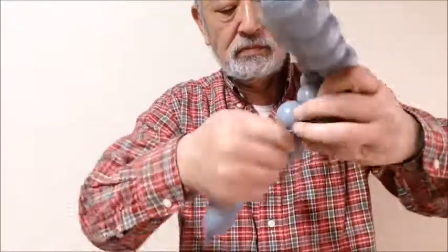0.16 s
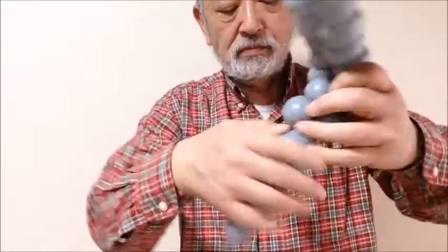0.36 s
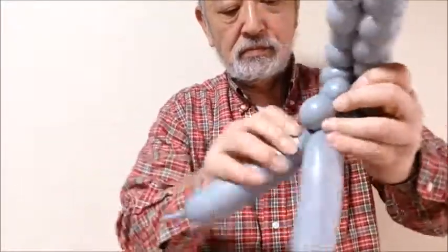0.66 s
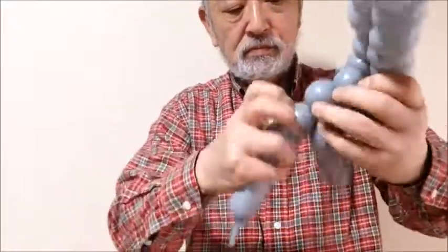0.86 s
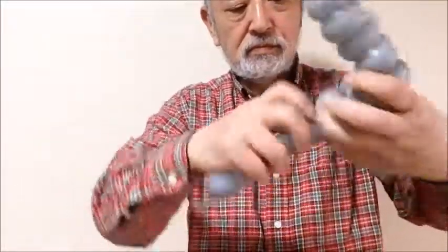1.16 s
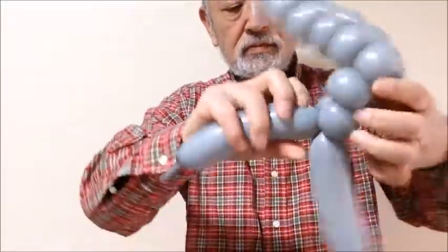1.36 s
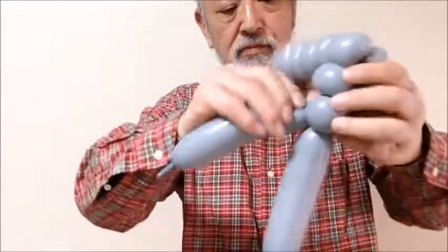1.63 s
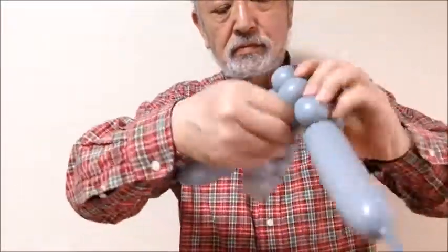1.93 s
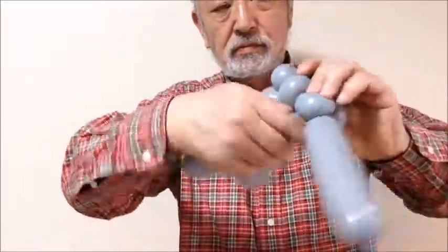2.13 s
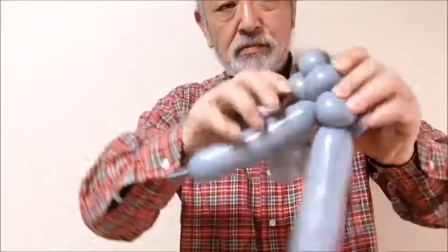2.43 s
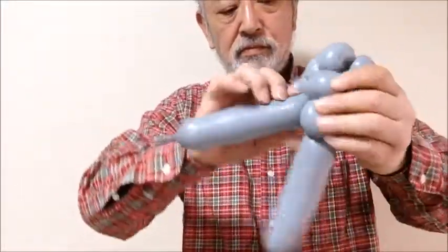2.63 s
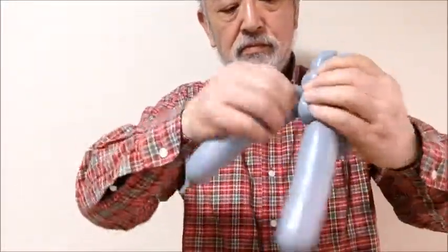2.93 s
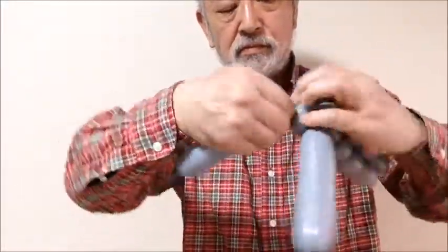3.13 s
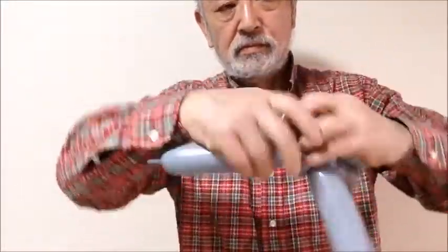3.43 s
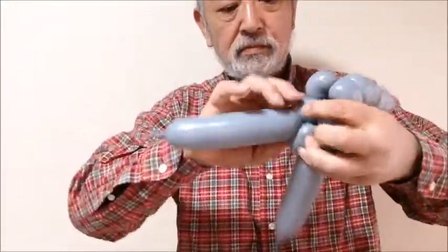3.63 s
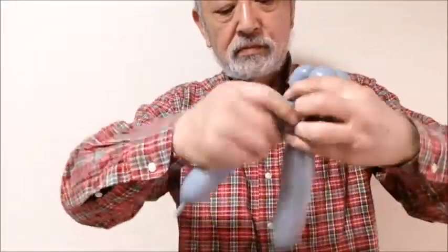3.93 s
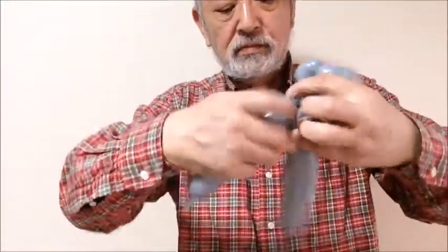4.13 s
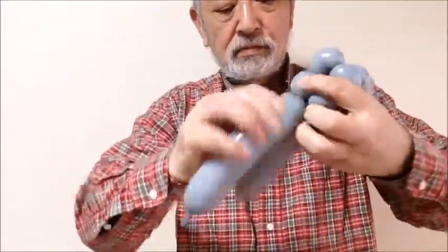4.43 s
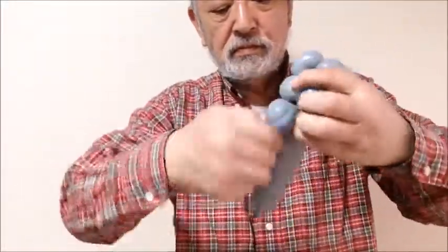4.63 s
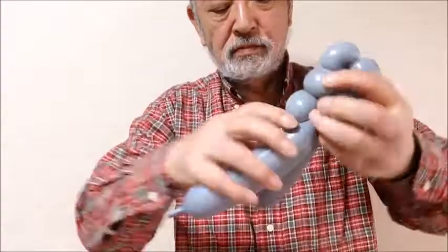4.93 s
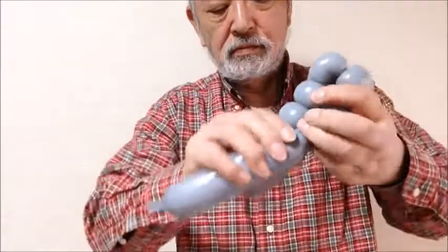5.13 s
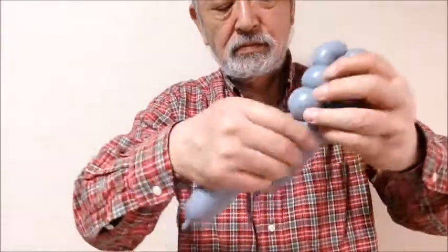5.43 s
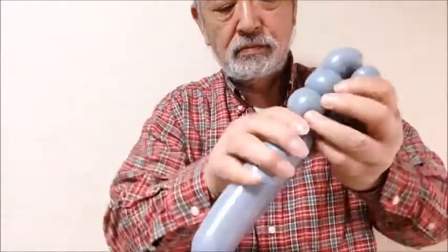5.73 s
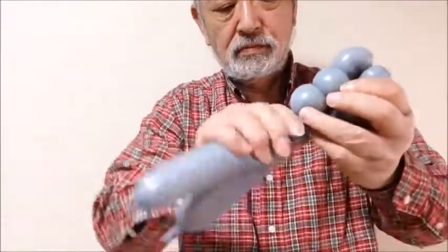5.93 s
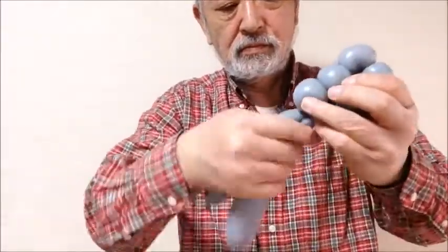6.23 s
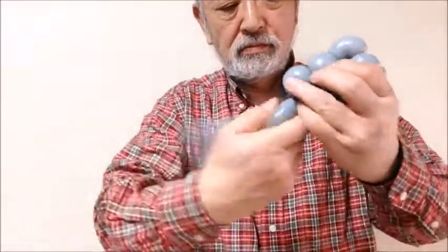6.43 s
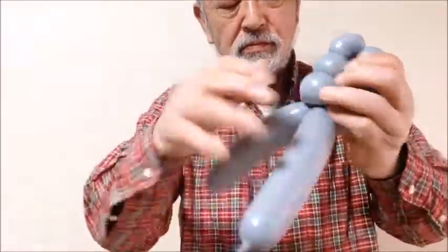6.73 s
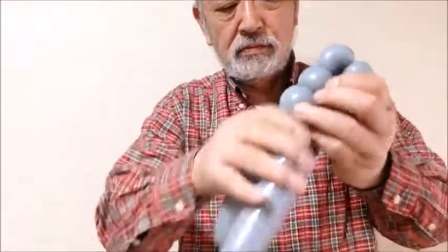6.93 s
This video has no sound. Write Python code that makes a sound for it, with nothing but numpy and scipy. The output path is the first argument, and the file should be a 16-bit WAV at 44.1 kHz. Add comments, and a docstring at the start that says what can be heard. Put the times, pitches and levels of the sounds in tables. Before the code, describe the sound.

Hands pinch and twist a long latex balloon into bubbles. The taut rubber sticks and slips in a quick, irregular run of sharp snaps, short creaks and tiny squeaks, while fingers rub the skin and bump it with soft hollow knocks. The sounds are busiest in the first half, then grow lighter and sparser. The microphone is close to the hands in a small room with a faint, low background noise.

```python
"""Twisting a latex balloon

A small room, one microphone close to the hands that pinch and twist a long balloon into bubbles.
Taut latex sticks and lets go: single slips snap, runs of slips creak, regular slips squeak.
Fingers bump the air-filled bubbles, and the room answers briefly over a faint, low room tone."""
import sys
import numpy as np
from scipy import signal
from scipy.io import wavfile
from scipy.ndimage import uniform_filter1d

SR = 44100
rng = np.random.default_rng(int(sys.argv[2]) if len(sys.argv) > 2 else 0)


def to_wav(sig):
    """Store sig (one row per channel, or 1-D mono) as 16-bit WAV at the path in sys.argv[1].

    Samples outside -1..1 are clipped; the rate is SR.
    """
    pcm = np.clip(np.atleast_2d(sig), -1, 1) * 32767
    pcm = np.round(pcm).astype(np.int16)
    wavfile.write(sys.argv[1], SR, pcm.T)  # frames by channels


N = 311787
TOP_HZ = 15500

# spells of regular stick-slip: start_s, length_s, level_db, first_hz, last_hz, ring_hz, roughness (0-1)
SQUEAK_SPELLS = [ (0.708, 0.01, -34, 765, 687, 1710, 0.31), (0.753, 0.049, -42.5, 288.5, 308, 2590, 0.38),
                 (2.12, 0.02, -37, 490.5, 416, 3730, 0.15), (2.297, .025, -35, 345, 335, 1150, .05),
                 (3.179, 0.048, -37.5, 493.4, 493, 2230, 0.23), (3.436, 0.0075, -27, 932, 1170, 2000, 0.16),
                 (3.445, .032, -37, 400, 375, 2150, .12), (4.04, 0.073, -40.5, 400, 366, 1330, 0.35),
                 (4.626, 0.011, -40.5, 808, 710, 2000, 0.27), (5.583, 0.01, -34, 1224, 1210, 1250, 0.23),
                 (5.663, .02, -35.5, 1300, 800, 1500, .24), (6.096, 0.0087, -43, 1170, 1060, 1080, 0.33),
                 (6.126, 0.017, -43, 1233, 1140, 1170, 0.34), (6.585, 0.011, -33, 1598, 1300, 1400, 0.28)]
# hollow spectrum of the air inside the balloon: frequency_hz, gain_db
HOLLOW_SPECTRUM = [(30, -34), (105, -22), (170, -7), (450, 8.5), (800, 4.5), (1200, -8), (3000, -56.5)]
# bright spectrum of latex tearing loose: frequency_hz, gain_db
CRACK_SPECTRUM = [(1500, -27.5), (3500, 2), (5600, 4), (8000, 1), (12000, -2.5), (15500, -10)]
# spectrum of rubbed latex: frequency_hz, gain_db
CREAK_SPECTRUM = [(60, -40), (110, -33), (180, -1.5), (300, -5), (460, 9), (650, 1.5), (1100, 4.5),
                  (1800, 4.5), (2800, 4.5), (4500, 2.5), (7000, -37.5), (14000, -18.5)]


def snaps(crack_db=2, tear_cycles=0.47, crack_s=0.00028, ragged=2.14, again_share=0.61, again_s=0.00168):
    """A stuck patch tears loose within a cycle or two: it rings, cracks and pushes the air inside."""
    # single loud slips: start_s, level_db, ring_hz, crack_share_db (before crack_db)
    loud_slips = [(0.074, -37, 1090, -20), (0.0884, -17.5, 2050, -13), (0.1164, -21, 1980, -10),
                  (0.142, -33, 1700, -17), (0.1564, -26.5, 2100, -18), (0.2278, -24.5, 1950, -9),
                  (0.263, -26.5, 2200, -1), (0.3303, -31.5, 1770, -17), (0.4522, -33, 2600, -9),
                  (0.4698, -34.5, 3750, -1.5), (0.5952, -53, 2120, 3), (0.6807, -48, 1280, -22),
                  (0.982, -29.5, 1410, -35), (1.001, -39, 1110, -14), (1.065, -33, 1460, -11),
                  (1.0758, -24, 4550, -18), (1.0992, -18, 1410, -22), (1.1176, -19, 2440, -37),
                  (1.153, -30, 2360, -8.5), (1.1627, -33, 1610, -13), (1.2404, -36, 890, -16),
                  (1.2546, -29.5, 2770, -12), (1.3512, -35.5, 2820, -1.5), (1.6576, -36.5, 1940, -18),
                  (1.6921, -34, 1580, -20), (1.7293, -33.5, 1880, 0), (1.7732, -32, 1960, -20),
                  (1.7507, -32, 1870, -3), (1.79, -22, 1580, -24), (1.806, -20.5, 2640, -26),
                  (1.8209, -24, 1660, -32), (1.8417, -29, 1900, -12), (1.8816, -27, 2010, -24),
                  (1.9404, -35, 1480, -9.5), (1.9863, -41, 2620, 4), (2.041, -32, 4600, -2.5),
                  (2.0789, -34.5, 3300, 1.5), (2.104, -36.5, 1910, 2.5), (2.1678, -34.5, 1940, 4),
                  (2.1907, -35.5, 2170, -3), (2.2356, -34.5, 1960, -1.5), (2.2657, -41.5, 1790, -12),
                  (2.4806, -55.5, 4290, 2), (2.5784, -39.5, 1940, -10.5), (2.693, -42.5, 4120, 1),
                  (2.863, -37, 990, -14), (2.882, -34.5, 3220, -6.5), (2.8955, -29, 1540, -1),
                  (2.9298, -33.5, 1510, -8), (2.9442, -22, 2900, -3), (2.9767, -31, 2160, -6),
                  (3.0858, -35.5, 3840, -14), (3.1186, -39, 2000, -15), (3.1491, -40, 1040, -5),
                  (3.1745, -25.5, 1970, -12.5), (3.2637, -25, 3860, -12.5), (3.3876, -32, 1570, -8),
                  (3.429, -36, 1600, -5), (3.5465, -37, 2030, -15), (3.6469, -45.5, 1700, -7),
                  (3.6887, -43.5, 2390, -2), (3.7276, -45.5, 2730, -8), (3.7815, -41, 3380, -1.5),
                  (3.9249, -35.5, 2680, -3.5), (3.9917, -36, 1880, 0), (4.0323, -23.5, 1600, -14),
                  (4.057, -32, 1790, -7), (4.18, -38, 3140, -18), (4.2365, -26, 1470, -10),
                  (4.3197, -33, 2680, -13), (4.489, -39, 4970, 2.5), (4.5233, -34.5, 1530, -16),
                  (4.6287, -32.5, 1800, -6), (4.7208, -38.5, 4960, -8), (5.0254, -43, 1380, -19),
                  (5.1046, -38.5, 3060, -7.5), (5.138, -40, 1490, -23), (5.1796, -38, 1550, -19),
                  (5.3321, -29.5, 1660, -13.5), (5.473, -45.5, 1560, 2.5), (5.4921, -34, 2260, -5),
                  (5.497, -35, 2840, 1.5), (5.523, -32.5, 2950, -2.5), (5.5745, -34, 2630, -24),
                  (5.7088, -37.5, 3650, -14), (5.8405, -48, 1000, -11), (5.936, -47, 950, -19),
                  (5.978, -44, 1170, -20), (6.018, -31.5, 1070, -18), (6.0972, -44.5, 890, -18),
                  (6.1263, -46.5, 2560, 1), (6.2037, -46, 885, -16), (6.2619, -44, 1100, -14),
                  (6.28, -30.5, 1780, -17), (6.344, -33, 2570, -6.5), (6.3995, -49, 1060, -13),
                  (6.4148, -48, 2340, -18), (6.4487, -45.5, 2270, -21), (6.566, -36.5, 3380, -6),
                  (6.5727, -39, 1170, -3), (6.8461, -55, 3540, 2.5), (7.006, -53, 3000, -2),
                  (7.0165, -48, 2400, -3), (7.0241, -29.5, 1960, -5.5)]
    out, t = np.zeros(N), np.arange(4096) / SR
    for start, db, hz, crack_share_db in loud_slips:
        # lighter, lower slips have more hollow body under their ring; hard, high ones ping
        force_db, octaves_up = db + 35, np.log2(hz / 2000)
        push_db = -14 - 0.67 * force_db - 3 * octaves_up
        body = skin(hz, width_hz=250, boost_db=5 + 0.04 * force_db)
        flutter = np.cos(2 * np.pi * hz * t) + ragged * noise(len(t))
        tear = swell(t, tear_cycles / hz) * flutter + 1.56 * (t == 0)
        rip = swell(t, crack_s) * noise(len(t))
        # the patch catches and gives once more, a moment later
        later = np.maximum(t - again_s * rng.uniform(.4, 1.4), 0)
        tear += again_share * ragged * swell(later, tear_cycles / hz) * noise(len(t))
        rip += again_share * swell(later, crack_s) * noise(len(t))
        ring = unit_attack(signal.fftconvolve(tear, body)[:len(t)])
        push = amp(push_db) * unit_attack(colour(tear, HOLLOW_SPECTRUM))
        crack = amp(crack_share_db + crack_db) * unit_attack(colour(rip, CRACK_SPECTRUM))
        add(out, start, amp(db) * (ring + push + crack))
    return out


def creaks(boost_db=7, width_octaves=0.86, rise_db_per_s=1097, fall_db_per_s=500, lead_s=0.03):
    """Latex drags over latex in a dense run of tiny slips that builds quickly, holds and eases off."""
    # drags: start_s, length_s, level_db, ring_hz, crackle_share_db
    drags = [(0.094, 0.035, -41, 2600, -9), (0.274, 0.024, -39.5, 2900, -6), (0.43, 0.028, -46.5, 600, -7),
             (0.521, 0.03, -47, 1800, -13), (0.68, 0.025, -50, 1100, -4), (0.76, 0.03, -32.5, 2290, -8),
             (1.003, .035, -43.5, 1200, -11), (1.069, 0.014, -35.5, 1400, -4),
             (1.107, 0.022, -33, 2100, -11), (1.145, .03, -44.5, 2200, -16), (1.213, .02, -50, 700, -22),
             (1.245, 0.02, -41, 1090, -20), (1.313, 0.039, -44, 1340, -7), (1.679, 0.022, -39, 1600, -7),
             (1.717, 0.13, -37.5, 1640, -8.5), (1.86, 0.053, -43.5, 1900, -8.5),
             (2.049, 0.095, -44, 3240, -4), (2.193, 0.017, -49, 2100, -7), (2.267, 0.051, -44.5, 1690, -5),
             (2.809, 0.086, -51, 1500, -11), (2.889, 0.11, -42.5, 2000, -5), (3.001, 0.091, -47, 1700, -17),
             (3.122, 0.028, -45, 480, -8), (3.154, 0.057, -39, 470, -4.5), (3.17, 0.12, -42, 2200, -4.5),
             (3.38, 0.05, -49, 1500, -5), (3.55, 0.072, -51, 1580, -4), (3.823, 0.039, -50, 1420, -4.5),
             (3.935, 0.022, -38.5, 1640, -4.5), (3.997, 0.023, -41.5, 1920, -3),
             (4.042, 0.055, -30, 1400, -6), (4.18, 0.013, -44.5, 1300, -15),
             (4.241, 0.093, -43.5, 1390, -9), (4.414, 0.0098, -53, 1100, -19),
             (4.524, 0.022, -44, 1530, -2), (4.63, 0.014, -48, 1820, -1), (4.867, 0.04, -48, 1200, -17),
             (5.112, 0.066, -56, 1500, -18), (5.496, 0.028, -49, 2800, -12), (5.581, 0.019, -40, 1400, -29),
             (5.67, 0.042, -53.5, 2000, -4), (6.018, 0.014, -39, 930, -11), (6.111, 0.063, -51, 695, -5.5),
             (6.283, 0.019, -47.5, 1000, -8), (6.4, 0.032, -50.5, 1100, -11), (6.569, 0.021, -38, 1310, -7),
             (6.672, 0.013, -54, 1000, -25), (6.767, 0.015, -56, 2520, -3),
             (6.943, 0.0094, -51.5, 1590, -9), (7.024, 0.015, -42.5, 1900, -3)]
    out, t = np.zeros(N), np.arange(SR // 3) / SR - lead_s
    for start, length, db, hz, crackle_db in drags:
        run = slips(len(t), per_s=420, spread_db=4.0, hiss=0.31)
        body = impulse(lambda f: read(CREAK_SPECTRUM, f) - 2 * (f < 700)
                       + boost_db / (1 + (np.log2((f + 1) / hz) / width_octaves) ** 2))
        sliding = run + 0.59 * noise(len(t))
        creak = unit_rms(signal.fftconvolve(sliding, body)[:len(t)])
        # the bigger a slip, the more sharply it cracks
        crackle = amp(crackle_db) * unit_rms(colour(run * abs(run) ** 0.13, CRACK_SPECTRUM))
        ease_db = rise_db_per_s * np.minimum(t, 0) - fall_db_per_s * np.maximum(t - length, 0)
        add(out, start - lead_s, amp(db + ease_db) * (creak + crackle))
    # the creak gives way by up to 10 dB while the slips lock into a squeak
    clock = np.arange(N) / SR
    locked = sum(abs(clock - start - length / 2) < length / 2 for start, length, *_ in SQUEAK_SPELLS)
    return out * amp(-10 * uniform_filter1d(np.minimum(locked, 1.), 400))


def squeaks(gain_db=1, hollow_db=-13, waver=0.031, waver_hz=45):
    """Slips lock into a rhythm: a gliding pulse train rings the skin and the hollow under it."""
    out = np.zeros(N)
    hollow = amp(hollow_db) * impulse(lambda f: read(HOLLOW_SPECTRUM, f))
    for start, length, db, first_hz, last_hz, ring_hz, roughness in SQUEAK_SPELLS:
        count = int(length * SR)
        wobble, pressure = (unit_rms(uniform_filter1d(noise(count), 50)) for _ in range(2))
        bend = waver * np.sin(2 * np.pi * (waver_hz * np.arange(count) / SR + rng.random()))
        pitch_hz = np.geomspace(first_hz, last_hz, count) * (1 + bend + roughness * wobble / 2)
        turns = np.cumsum(pitch_hz) / SR
        orders = np.arange(1, int(TOP_HZ / max(first_hz, last_hz)))
        # a slack, low-ringing patch lets go more softly, so its upper harmonics are weak
        weights = 1 / (1 + (orders * first_hz / (2 * ring_hz)) ** 2)
        pulses = weights @ np.cos(2 * np.pi * np.outer(orders, turns))
        pulses *= amp(10 * roughness * pressure) * signal.windows.tukey(count, .4)
        squeak = signal.fftconvolve(pulses, skin(ring_hz, width_hz=230, boost_db=6) + hollow)
        add(out, start, amp(db + gain_db) * squeak / squeak[:count].std())
    return out


def bumps(gain_db=-2, tube_db=-2, scuff_db=-9, bubble_s=0.0063, tube_s=0.006, rise_s=0.0056, sag=0.21):
    """A finger's soft knock sounds a bubble and the long tube; the pitch sags as the skin relaxes."""
    # knocks and releases, pitches at mid-sag: start_s, level_db (before gain_db), bubble_hz, tube_hz
    knocks = [(0.566, -47, 360, 314), (0.656, -43, 387, 240), (0.734, -43, 490, 256),
              (0.988, -41.5, 386, 306), (1.241, -42.5, 405, 290), (1.336, -39.5, 417, 168),
              (1.346, -40, 403, 307), (1.437, -46, 412, 183), (1.621, -46.5, 442, 320),
              (1.831, -37.5, 638, 207), (2.379, -47, 410, 200), (2.576, -41, 444, 188),
              (2.596, -43.5, 413, 238), (2.945, -41, 466, 240), (3.172, -42.5, 489, 437),
              (3.47, -46, 403, 318), (3.645, -46, 543, 343), (4.246, -35, 440, 247), (4.336, -40, 380, 331),
              (4.912, -45.5, 295, 227), (5.068, -45, 270, 202), (5.175, -42.5, 533, 345),
              (5.759, -45.5, 444, 321), (6.02, -46, 480, 340), (6.105, -49.5, 440, 336),
              (6.574, -41, 387, 140), (6.579, -36.5, 440, 223)]
    out, t = np.zeros(N), np.arange(4096) / SR
    pitch_ratio = 1 + sag * (2 * np.exp(-t / 0.014) - 1)
    phase_per_hz = 2 * np.pi * np.cumsum(pitch_ratio) / SR
    for start, db, bubble_hz, tube_hz in knocks:
        bubble = np.sin(bubble_hz * phase_per_hz) * np.exp(-t / bubble_s)
        tube = amp(tube_db) * np.sin(tube_hz * phase_per_hz) * np.exp(-t / tube_s)
        scuff = amp(scuff_db) * unit_rms(colour(noise(len(t)), HOLLOW_SPECTRUM)) * np.exp(-t / 0.0074)
        knock = (bubble + tube + scuff) * (1 - np.exp(-t / rise_s))
        add(out, start, amp(db + gain_db) * knock / knock[:660].std())
    return out


def grip(friction_db=-1, crackle_db=-6):
    """Fingers shift on the skin, resting briefly near the end: soft sliding with scattered ticks."""
    # course of the rubbing: time_s, level_db (before friction_db and crackle_db)
    rubbing = [(0, -53), (0.4, -58), (0.62, -63), (1.2, -50.5), (1.56, -57), (1.949, -55), (2.45, -55),
               (2.75, -57), (3.1, -50), (3.55, -60.5), (4.4, -53.5), (4.72, -51.5), (5.25, -57), (5.8, -53),
               (6.22, -64), (6.7, -59.5), (6.89, -86), (7.07, -65)]
    run = slips(N, per_s=110, spread_db=2.5, hiss=1.0)
    level = amp(np.interp(np.arange(N) / SR, *np.transpose(rubbing)))
    friction = amp(friction_db) * unit_rms(colour(run, CREAK_SPECTRUM))
    crackle = amp(crackle_db) * unit_rms(colour(run, CRACK_SPECTRUM))
    return level * (friction + crackle)


def jolts(thud_hz=130, rise_s=0.0011):
    """A hard slip moves the whole balloon at once with a short, dull thud."""
    # thuds: start_s, level_db
    thuds = [(0.1156, -61), (1.0985, -53), (2.9441, -57), (3.1745, -65), (4.2366, -66)]
    out, t = np.zeros(N), np.arange(4096) / SR
    for start, db in thuds:
        add(out, start, amp(db) * np.sin(2 * np.pi * thud_hz * t) * swell(t, rise_s))
    return out


def room(x, wet_db=-3, gap_s=0.0015, echoes_per_s=5000):
    """Dense reflections reach the microphone from body, table and walls; the bass lasts longest."""
    # the room's decay: frequency_hz, t60_s
    decay = [(150, 0.23), (500, 0.17), (2000, 0.18), (5000, 0.17), (14000, 0.18)]
    count = SR // 2
    echoes = rng.choice([-1., 1.], count) * (rng.random(count) < echoes_per_s / SR)
    hz, t, bands = signal.stft(echoes, SR, nperseg=256)
    tail = signal.istft(bands * amp(-60 * t / read(decay, hz)[:, None]), SR, nperseg=256)[1]
    tail *= np.arange(len(tail)) > gap_s * SR
    return amp(wet_db) * signal.fftconvolve(x, tail / np.linalg.norm(tail))[:N]


def room_tone(level_db=-62.5):
    """Faint, steady noise behind the balloon, strongest in the low notes."""
    # background spectrum: frequency_hz, gain_db
    spectrum = [(25, -23), (70, -53), (110, -11), (165, 11), (260, 6.5), (500, 4.5), (1200, -3.5),
                (4000, -3.5), (15000, -7.5)]
    return amp(level_db) * unit_rms(colour(noise(N), spectrum))


def skin(ring_hz, width_hz, boost_db):
    """The skin's answer to one slip: a broad band, with the resonance of the pinched patch on top."""
    # spectrum of taut latex: frequency_hz, gain_db
    latex = [(300, -37), (800, -3.5), (1400, 1.5), (2100, 2.5), (3000, 0.5), (4500, -2.5), (6000, -6.5),
             (10000, -19)]
    return impulse(lambda f: read(latex, f) + boost_db / (1 + ((f - ring_hz) / width_hz) ** 2))


def slips(count, per_s, spread_db, hiss):
    """Small slips at random moments and of uneven size, over a trace of smooth sliding."""
    slipping = rng.random(count) < per_s / SR
    size = amp(spread_db * np.minimum(rng.exponential(1, count), 3))
    train = slipping * size * np.sign(noise(count))
    return unit_rms(unit_rms(train) + hiss * noise(count))


def impulse(db_at, size=2048):
    """The causal impulse response whose gain follows db_at(Hz)."""
    log_gain = np.log(amp(db_at(abs(np.fft.fftfreq(size, 1 / SR)))))
    return np.fft.ifft(np.exp(np.conj(signal.hilbert(log_gain)))).real[:size // 2]


def colour(x, spectrum):
    """Filters x with a spectrum."""
    return signal.fftconvolve(x, impulse(lambda f: read(spectrum, f)))[:len(x)]


def read(points, hz):
    """The value at hz of points joined by straight lines on a log-frequency axis."""
    f, value = np.transpose(points)
    return np.interp(np.log(hz + 1), np.log(np.sort(f) + 1), value)


def swell(t, peak_s):
    """Rises to one at peak_s and dies away."""
    return t / peak_s * np.exp(1 - t / peak_s)


def unit_attack(x):
    """Scales to an rms of one over the first four milliseconds."""
    return x / np.sqrt(np.mean(x[:176] ** 2) + 1e-20)


def unit_rms(x):
    return x / np.sqrt(np.mean(x ** 2) + 1e-20)


def amp(db):
    return 10 ** (np.asarray(db) / 20)


def noise(count):
    return rng.standard_normal(count)


def add(mix, start_s, sound):
    part = mix[max(round(start_s * SR), 0):][:len(sound)]
    part += sound[:len(part)]


def scene():
    """Snaps, creaks, squeaks and knocks close to the microphone in a small room."""
    balloon = snaps() + jolts() + bumps() + squeaks() + creaks() + grip()
    # reflections crossfade at 2.3 Hz and 0.37 Hz, which keeps the echo from ringing at fixed pitches
    fast, slow = 2 * np.pi * np.outer([2.3, .37], np.arange(N) / SR)
    fades = [a(fast) * b(slow) for a in (np.cos, np.sin) for b in (np.cos, np.sin)]
    reflections = sum(room(balloon * fade) for fade in fades)
    return (balloon + reflections + room_tone())[None]


def record(dry):
    """The recorder cuts the treble above TOP_HZ."""
    lowpass = signal.firwin(301, TOP_HZ, window=("kaiser", 8), fs=SR)
    return signal.oaconvolve(dry, lowpass[None], "same")


dry = scene()
out = record(dry)
to_wav(out)
```